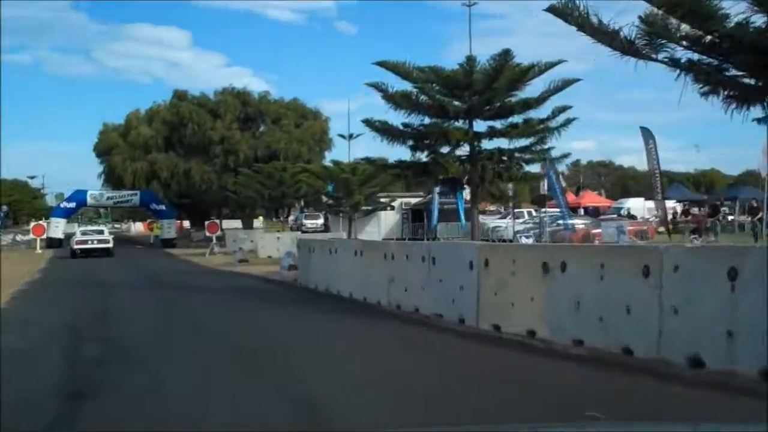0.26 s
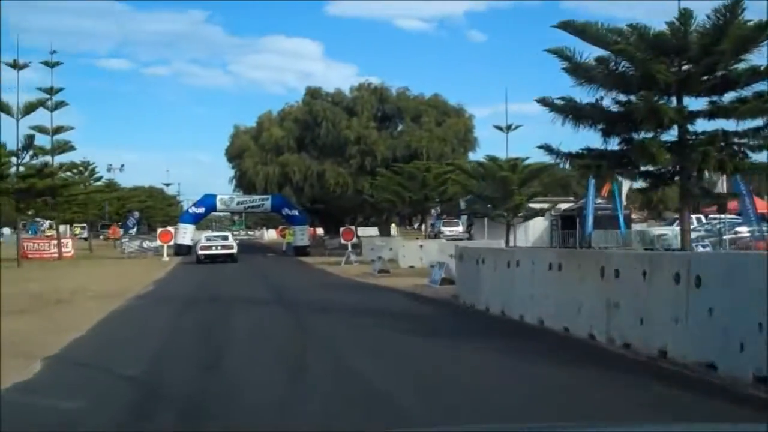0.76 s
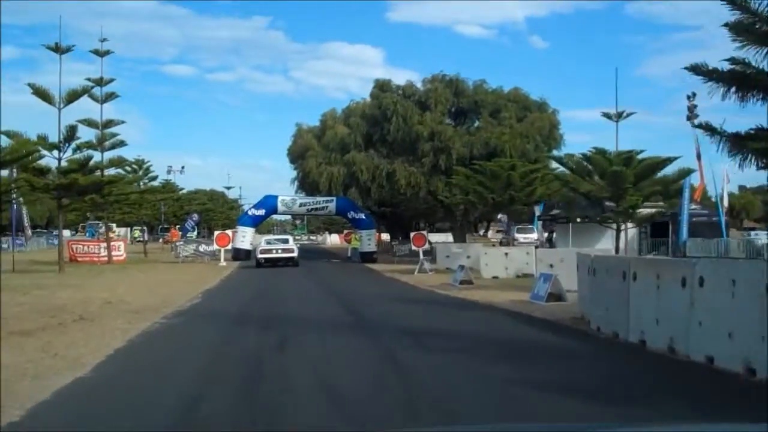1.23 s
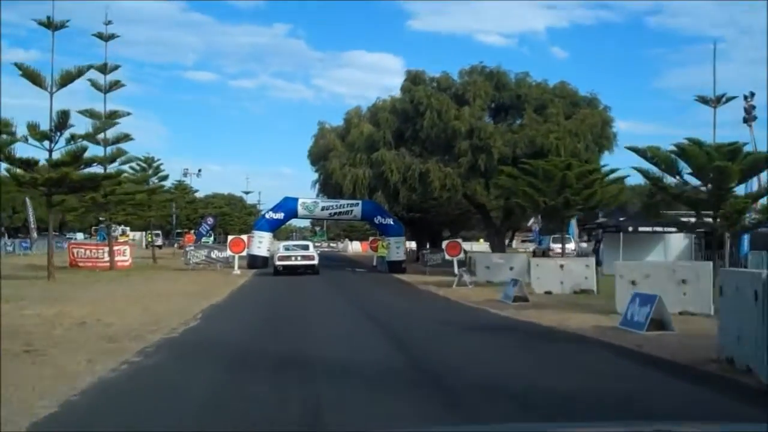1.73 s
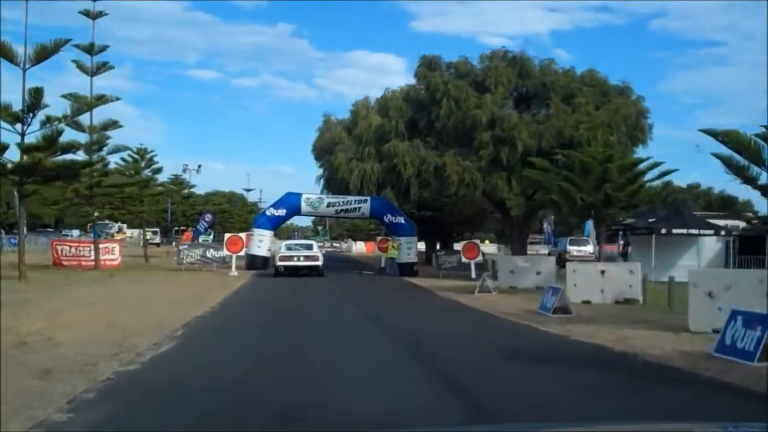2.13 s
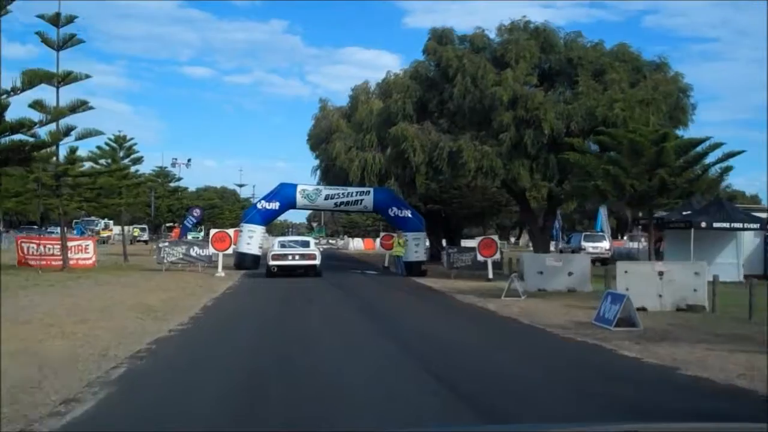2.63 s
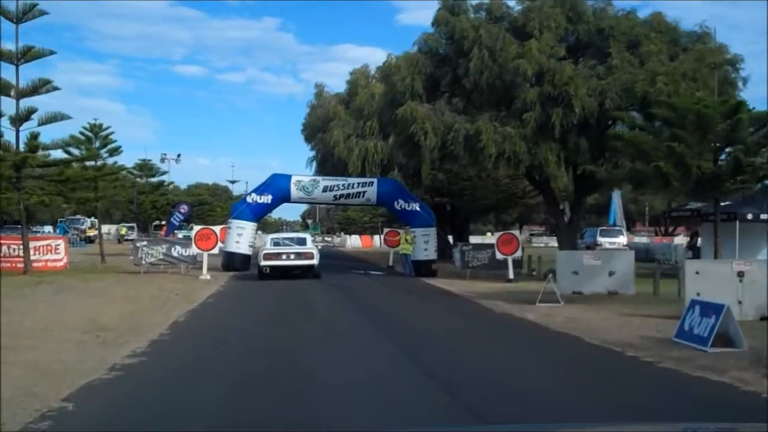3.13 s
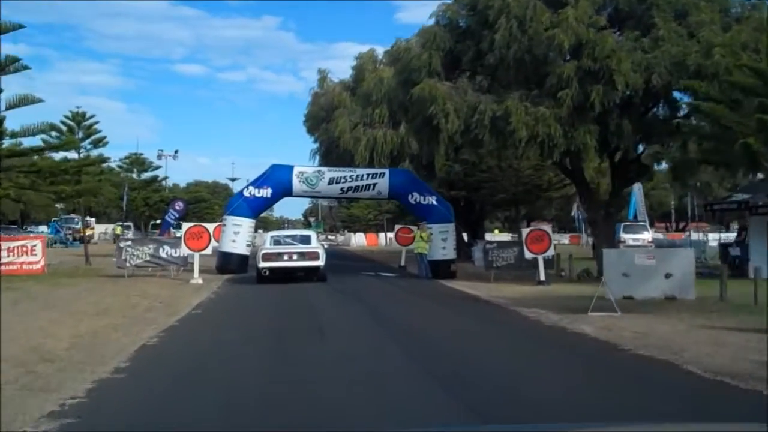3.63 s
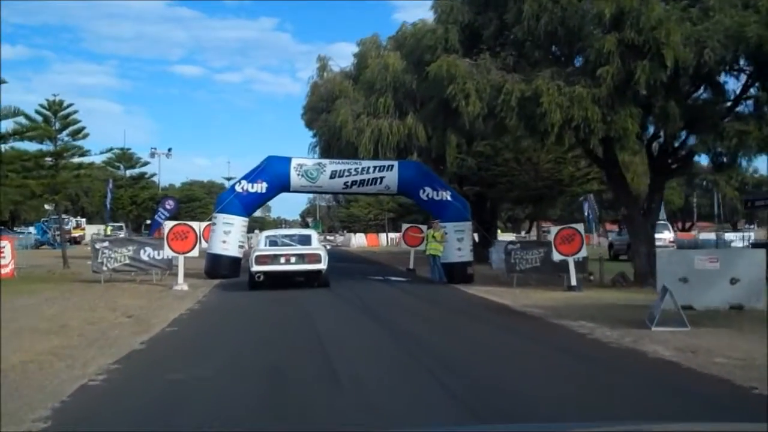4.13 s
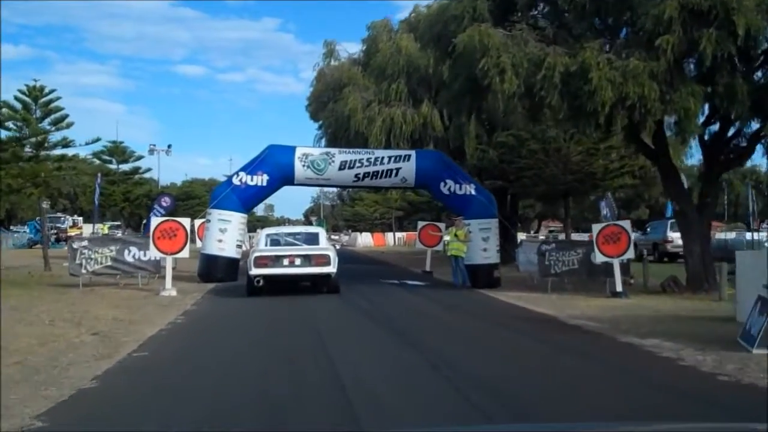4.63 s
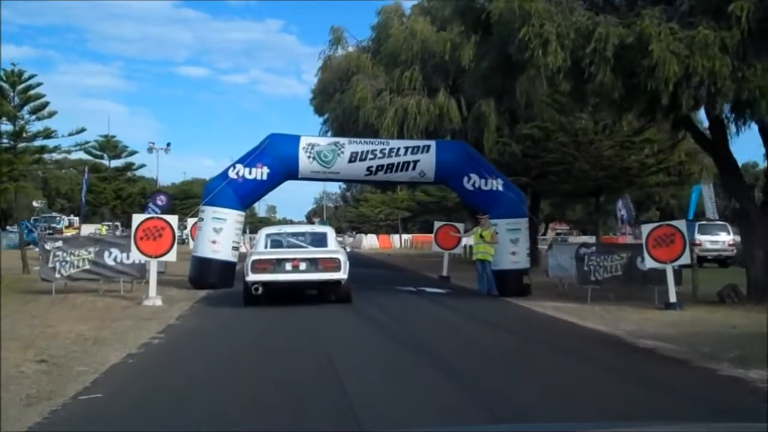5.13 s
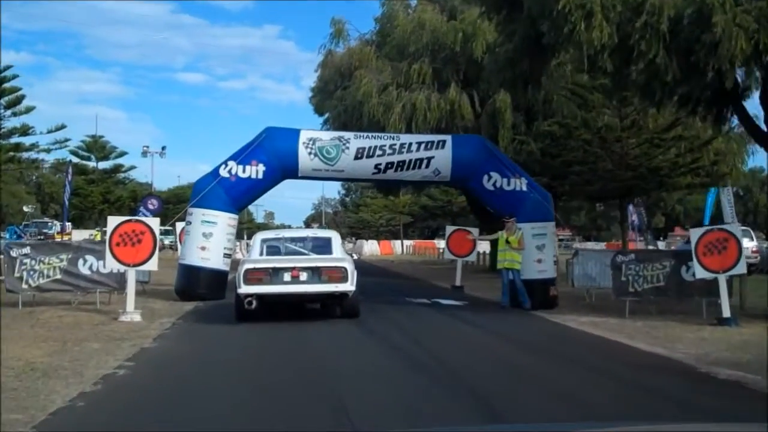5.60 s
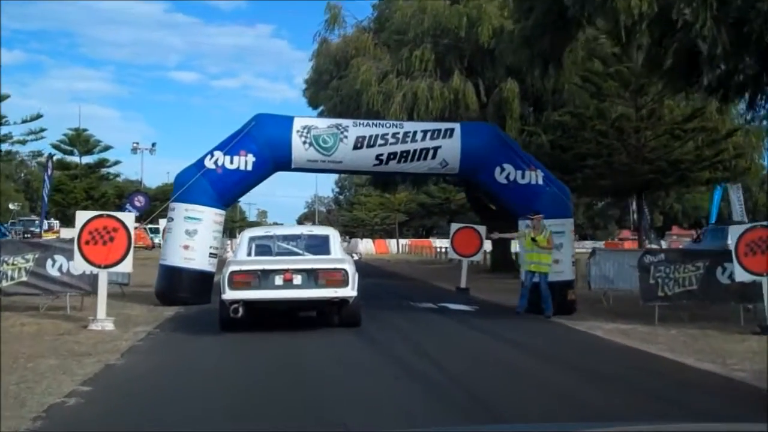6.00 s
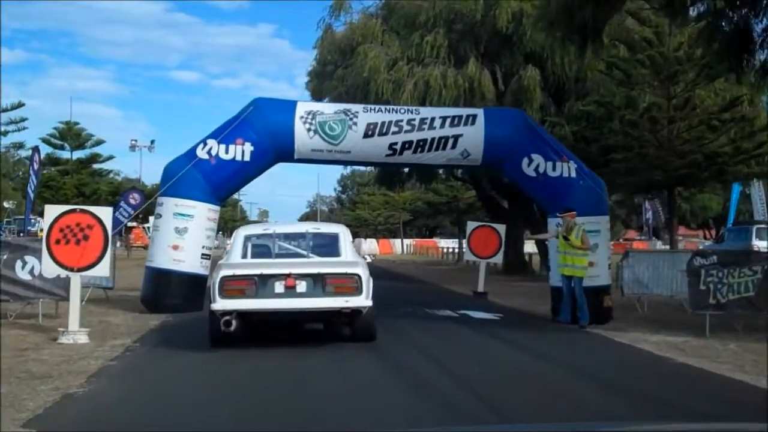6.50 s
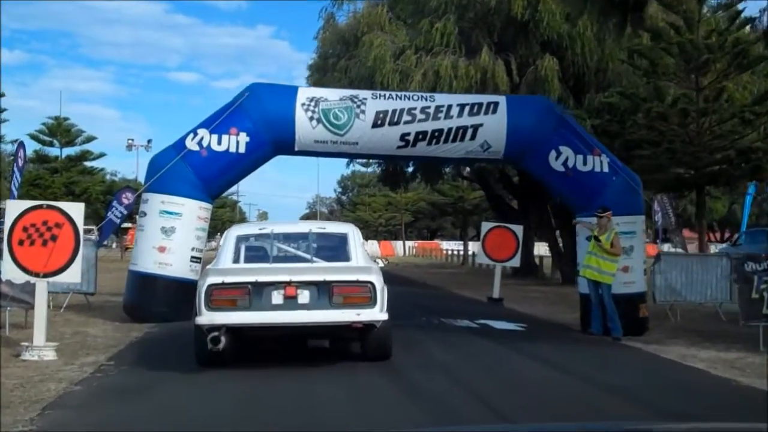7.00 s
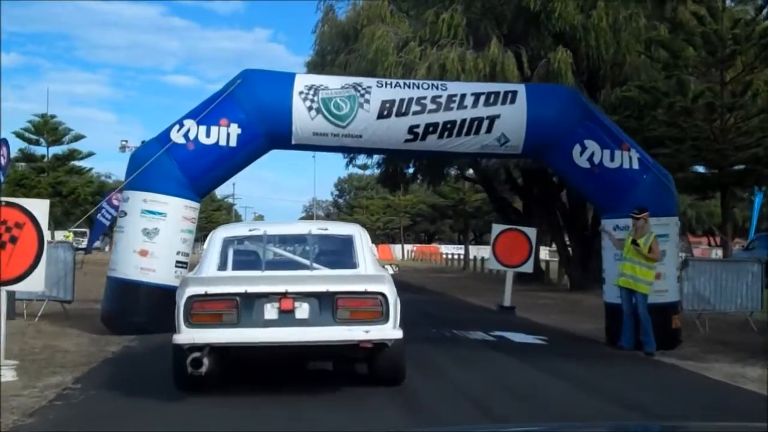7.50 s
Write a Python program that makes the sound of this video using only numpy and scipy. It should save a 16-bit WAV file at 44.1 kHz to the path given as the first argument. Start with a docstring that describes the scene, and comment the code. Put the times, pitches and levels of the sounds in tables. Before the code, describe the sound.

Heard from inside a stripped competition car, a deep engine drone and tyre rumble fill the cabin as it slows. The brakes squeak briefly around a quick downshift, then the revs sink to a lumpy near-idle while trim ticks and the body thuds softly. Finally another car in front gives three sharp, barking revs and begins to move off.

```python
"""A four-cylinder engine booms in the cabin of a stripped competition car that slows down, blips a
downshift and rolls up behind another car. The cabin passes the low engine orders as near sines; road
rumble rings the panels and a body mode, under hiss and a faint hum. Brake pads lock into squeaks, trim
and grit tick, and a faint whine comes as the car creeps. At the end the six-cylinder car ahead revs in
three bursts and pulls away, its uneven firings ringing the exhaust."""
import sys
import numpy as np
from scipy import signal
from scipy.io import wavfile
from scipy.ndimage import uniform_filter1d

SR = 44100
rng = np.random.default_rng(int(sys.argv[2]) if len(sys.argv) > 2 else 0)


def dump_mix(stems):
    """Bounce the given channels to the path in sys.argv[1] as a 16-bit WAV at rate SR."""
    frames = np.atleast_2d(stems).T  # one column per channel
    limited = np.clip(frames, -1, 1)  # hard clip at full scale
    pcm = np.round(limited * 32767).astype(np.int16)
    wavfile.write(sys.argv[1], SR, pcm)


N = 341775
TIME_S = np.arange(N) / SR
LEFT_RIGHT = np.array([[1], [-1]])


def from_db(db):
    return 10 ** (np.asarray(db) / 20)


def unit_rms(x):
    return x / np.sqrt(np.mean(x ** 2) + 1e-20)


def in_time(rows):
    times_s, *columns = np.transpose(rows)
    return [np.interp(TIME_S, times_s, column) for column in columns]


def at_hz(rows, hz):
    points_hz, values = np.transpose(rows)
    return np.interp(np.log(hz), np.log(points_hz), values)


def drift(rate_hz):
    """Slow random wander, rms 1: noise through two one-pole low-passes."""
    r = np.exp(-80 * np.pi * rate_hz / SR)
    slow = signal.lfilter([1], [1, -2 * r, r * r], rng.standard_normal(N // 40 + 2002))[2000:]
    return np.interp(np.arange(N) / 40, np.arange(len(slow)), unit_rms(slow))


def waver():
    """Gain that swells and sinks by a few dB."""
    return from_db(2 * drift(8))


def band(x, low_hz, high_hz):
    return signal.sosfilt(signal.butter(2, [low_hz, high_hz], "band", fs=SR, output="sos"), x)


def resonance(x, hz, width_hz):
    """Two-pole peak, unity gain on top."""
    r = np.exp(-np.pi * width_hz / SR)
    feedback = [1, -2 * r * np.cos(2 * np.pi * hz / SR), r * r]
    return signal.lfilter(np.array([1, 0, -1]) * (1 - r * r) / 2, feedback, x)


# Own engine: t/s, firing rate/Hz, load/dB
ENGINE = [(0, 117.6, 2.5), (.6, 109, 0.5), (1.1, 109, 1.5), (1.34, 101, -2.5), (1.415, 98, -11),
          (1.48, 88, 3.5), (1.54, 108, 5), (1.614, 137, 3.5), (1.674, 150, 7.5), (1.688, 155, -9),
          (1.702, 163, 0.5), (1.755, 165, 3.5), (1.795, 123, -18), (1.825, 112, -2.5), (1.885, 127, -14),
          (1.92, 141, -3), (1.955, 141, -17), (1.98, 145, -4.5), (2.09, 134, -1), (2.37, 113, 0),
          (2.6, 91, -7.5), (2.95, 69.6, -4), (3.18, 55.3, -4), (3.42, 46.2, -7.5), (3.55, 44.2, -3),
          (3.7, 44.8, -11.5), (3.85, 44.4, -13), (4.25, 39.2, -7.5), (4.38, 43, -11), (4.46, 34.2, -8),
          (4.54, 43, -5), (4.6, 54, 1), (4.72, 65, 0.5), (4.9, 67.5, -0.5), (5.14, 68.7, -1),
          (5.26, 65.4, -5.5), (5.42, 51, -7.5), (5.76, 49.2, -7.5), (6.0, 45, -4.5), (6.3, 48.7, -7.5),
          (6.5, 39.6, -5), (6.7, 46, -6), (7.0, 47.5, -6), (7.3, 40.6, -14.5), (7.37, 47, -11),
          (7.75, 53, 3.5)]
# Cabin response to engine tones: f/Hz, gain/dB
CABIN = [(35, -15), (46, -28.5), (57, -18), (68, -28), (85, -22), (97, -15.5), (111, -11.5), (124, -14),
         (137, -13), (155, -20.5), (182, -17), (204, -19), (240, -27), (275, -35), (330, -33.5), (460, -44),
         (570, -31.5)]
# Firing harmonics 2-6: level/dB
OVERTONES_DB = [-13, -19.5, -20.5, -23, -24]
# Harmonic offsets: t/s, 2nd/dB, 3rd/dB
OVERTONE_OFFSETS = [(0, -1.5, 9), (2.5, 1.5, -2), (3.1, -0.5, -1), (3.4, -2.5, 0.5), (3.55, 9.5, -14),
                    (3.85, 7.5, -16), (4.3, 8, -5), (4.48, -5, 15), (4.56, 1.5, 7.5), (4.64, 3.5, 2),
                    (5.1, 1.5, 1), (5.2, -7, -16), (5.4, 1.5, 2.5), (5.8, -1.5, 1.5), (6.1, -12, 3.5),
                    (6.35, -1, 4), (6.5, -1, 2.5), (7.3, 6, -7), (7.75, -4, -15)]
# Orders from uneven cylinders: multiple of firing rate, level/dB re road
WEAK_ORDERS = [(.5, -16), (1.5, -21), (2.5, -7.5)]
CABIN_CUT_HZ = 222

def own_engine(road_db):
    """Engine orders boom through the cabin as near sines; slow firings are sharper and less even."""
    firing_hz, load_db = in_time(ENGINE)
    phase = 2 * np.pi * np.cumsum(firing_hz * (1 + 0.0039 * drift(18.66))) / SR
    octaves_down = np.maximum(np.log2(110 / firing_hz), 0)
    load_db = load_db + 1.2 * octaves_down * drift(20)
    out = from_db(load_db + at_hz(CABIN, firing_hz) + 0.63 * drift(25)) * np.sin(phase)
    offset_db = dict(zip([2, 3], in_time(OVERTONE_OFFSETS)))
    for multiple, level_db in enumerate(OVERTONES_DB, start=2):
        overtone_db = level_db + 3.5 * octaves_down + offset_db.get(multiple, 0)
        gain = from_db(load_db + overtone_db + at_hz(CABIN, multiple * firing_hz)) * waver()
        slip_rad = .18 * drift(13)
        out += gain * np.sin(multiple * phase + 1 + slip_rad)
    for multiple, level_db in WEAK_ORDERS:
        passed = 1 / (1 + (multiple * firing_hz / CABIN_CUT_HZ) ** 6)
        gain = passed * from_db(road_db + level_db) * waver()
        out += gain * np.sin(multiple * phase + rng.uniform(0, 2 * np.pi))
    return np.sqrt(2) * out


# Hum, falling with road speed: t/s, f/Hz, level/dB
HUM = [(0, 272.2, -33.5), (1.5, 257.8, -52), (2.1, 284, -40), (2.5, 266.5, -43), (2.8, 235, -32.5),
       (3.25, 198.1, -33.5), (3.45, 184, -75)]
# Whine while creeping: t/s, f/Hz, level/dB
WHINE = [(3.6, 716, -58), (3.9, 731, -57.5), (4.5, 739.5, -62), (4.8, 741.6, -72)]

def faint_tone(curve, pitch_spread):
    """Hum or whine: one sine, unsteady in level and pitch."""
    hz, level_db = in_time(curve)
    gain = np.sqrt(2) * from_db(level_db + 2.9 * drift(6.1))
    return gain * np.sin(2 * np.pi * np.cumsum(hz * (1 + pitch_spread * drift(10))) / SR)


# Stereo width of the noise: f/Hz, left-right correlation
CORRELATION = [(60, 0.99), (180, 0.98), (530, 0.94), (1550, 0.62), (4590, 0.033), (13600, 0.051)]
# Stereo balance of the noise: f/Hz, left minus right/dB
BALANCE = [(60, 1.5), (230, 0.5), (900, 0.5), (3500, 1), (13600, -2.5)]
BASS_BELOW_HZ = 190

def shaped_noise(spectrum, flicker_db, bass_db=0):
    """Stereo noise in flickering third-octave bands, rms near 1."""
    bottom_hz, top_hz = spectrum[0][0], spectrum[-1][0]
    edges_hz = np.geomspace(bottom_hz, top_hz, int(3 * np.log2(top_hz / bottom_hz)))
    common_flicker = .5 * drift(2.7)
    white = rng.standard_normal((2, 2, N))
    out = 0
    for k, (low_hz, high_hz) in enumerate(zip(edges_hz, edges_hz[1:])):
        mid, side = band(white[k % 2], low_hz, high_hz)
        hz = np.sqrt(low_hz * high_hz)
        alike = np.clip(at_hz(CORRELATION, hz), 0, 1)
        level_db = at_hz(spectrum, hz) + bass_db * (hz < BASS_BELOW_HZ)
        level_db = level_db + flicker_db * (common_flicker + drift(17))
        gain = from_db(level_db + at_hz(BALANCE, hz) / 2 * LEFT_RIGHT)
        out = out + gain * (np.sqrt(1 + alike) * mid + np.sqrt(1 - alike) * side * LEFT_RIGHT)
    return out / np.sqrt(np.mean((out / from_db(bass_db / 2)) ** 2))


# Rolling noise: t/s, rumble/dB, hiss/dB, rumble bass offset/dB
ROLLING = [(0, -21.5, -45, -4.5), (.4, -21, -51.5, -7.5), (.62, -22, -48, -4.5), (1.5, -22, -50, -1.5),
           (1.6, -20, -50, 1), (1.95, -22, -50.5, -3), (3.19, -27.5, -55, -0.5), (3.91, -33, -54, -3.5),
           (4.7, -31, -55, 5), (5.5, -32, -55, 2.5), (6.6, -37, -55.5, 1), (7.2, -28.5, -50.5, 1.5),
           (7.75, -34.5, -61, -0.5)]
# Rumble and hiss spectra: f/Hz, relative density/dB
RUMBLE_SPECTRUM = [(22, 6), (40, 14), (75, 11), (110, 14.5), (200, 3.5), (290, -5), (350, -5.5), (600, -11),
                   (800, -18), (1200, -20.5), (1800, -22.5), (3000, -30.5)]
HISS_SPECTRUM = [(700, 1.5), (1100, -2.5), (2000, 0), (4000, 0), (7000, -6), (10000, -13), (11500, -30.5),
                 (14500, -39.5)]
# Panel modes: f/Hz, width/Hz, gain/dB
PANEL_MODES = [(216, 22, -2), (273, 29, -2.5), (342.6, 30, -2), (466, 40, 0.5), (570, 51, -0.5),
               (756, 27, -1.5), (993, 226, -3)]
# Panel ringing: t/s, gain/dB
PANEL_RING = [(0, -5), (.4, 3.5), (1.3, -0.5), (3.3, -3), (4.1, 4), (4.9, 3), (5.6, 0.5), (7.75, 12)]

def road_noise(road_db, hiss_db, bass_db):
    """Rolling makes rumble and hiss; the rumble rings the panels."""
    rumble = from_db(road_db) * shaped_noise(RUMBLE_SPECTRUM, flicker_db=1.74, bass_db=bass_db)
    ring_db, = in_time(PANEL_RING)
    panels = sum(from_db(db) * resonance(rumble, hz, width_hz) for hz, width_hz, db in PANEL_MODES)
    hiss = from_db(hiss_db) * shaped_noise(HISS_SPECTRUM, flicker_db=1.68)
    return rumble + from_db(ring_db) * panels + hiss


# Bumps: t/s, half length/s, f/Hz, level/dB
BUMPS = [(1.481, 0.036, 47.53, -24), (1.892, 0.07, 51, -17.5), (3.395, 0.055, 45.57, -22.5),
         (3.717, 0.039, 51.94, -26), (4.629, 0.06, 54.08, -31), (4.808, 0.036, 48.56, -27),
         (6.239, 0.14, 54.1, -25), (6.732, 0.05, 48.12, -20.5)]

def body_boom(road_db, mode_hz=50, width_hz=17, re_road_db=-18):
    """The road shakes a body mode; each bump makes it swell and fade."""
    bumps = np.zeros(N)
    for peak_s, half_s, hz, db in BUMPS:
        swell = from_db(db) * np.exp(-((TIME_S - peak_s) / half_s) ** 2)
        bumps += swell * np.sin(2 * np.pi * (hz * TIME_S + rng.random()))
    shake = resonance(resonance(rng.standard_normal(N), mode_hz, width_hz), mode_hz, width_hz)
    return np.sqrt(2) * bumps + from_db(road_db + re_road_db) * unit_rms(shake)


# Squeaks: t/s, length/s, f/Hz, level/dB, 2nd/dB re 1st, 3rd/dB re 1st, wobble/Hz
SQUEAKS = [(-.03, 0.29, 1735, -47, -23, -31, 15), (0.942, 0.15, 1750, -45, -19, -28, 32),
           (1.706, 0.12, 1740, -38.5, -24.5, -38, 3.8), (1.809, 0.16, 1748, -38.5, -19.5, -24, 4.1),
           (2.225, .13, 1784, -54, -3, -18, 12), (3.069, 0.073, 3250, -52, -24, -28, 3.47),
           (5.757, 0.11, 1728, -54, -23, -27, 5.04)]

def brakes():
    """Pad and disc lock briefly into a mode: an unsteady tone with two overtones."""
    out = np.zeros(N)
    for start_s, length_s, hz, db, second_db, third_db, wobble_hz in SQUEAKS:
        swell = np.sin(np.pi * np.clip((TIME_S - start_s) / length_s, 0, 1)) ** 0.85
        flutter_db = (1.2 + .12 * wobble_hz) * drift(45)
        phase = 2 * np.pi * np.cumsum(hz + wobble_hz * drift(28)) / SR
        second = from_db(second_db + 2.5 * drift(20)) * np.sin(2 * phase)
        third = from_db(third_db) * np.sin(3 * phase)
        out += swell * from_db(db + flutter_db) * (np.sin(phase) + second + third)
    return np.sqrt(2) * out


# Trim and grit ticks: t/s, bright part/dB, low part/dB
TICKS = [(0.0965, -49, -42), (0.308, -52, -34), (0.448, -62, -37), (0.7627, -39.5, -47), (0.79, -55, -35.5),
         (1.168, -41, -48), (1.262, -44, -46), (1.4307, -55, -39), (1.5216, -43, -39), (1.5527, -53, -36),
         (1.607, -56, -43), (2.1984, -48, -41), (2.4324, -40.5, -34), (2.6365, -48, -46), (2.74, -52, -40),
         (2.8409, -48, -53), (3.7925, -44, -42), (3.929, -56, -40), (4.3936, -35.5, -31.5),
         (4.424, -50, -41), (5.6469, -60, -33.5), (6.2, -61, -44), (7.347, -58, -41), (7.401, -47, -54),
         (7.443, -54, -40)]
# Trim modes: f/Hz, width/Hz, gain/dB
TRIM_MODES = [(1800, 350, 6), (4000, 550, 7)]

def ticks(rise_s=0.00037, t60_s=0.042, fast_until_s=2.8):
    """Trim and grit tick as noise bursts from random sides; eight faint extras while the car is fast."""
    out, t = np.zeros((2, N)), np.arange(SR // 10) / SR
    envelope = from_db(-60 * t / t60_s) * np.minimum(t / rise_s, 1)
    faint = [(fast_until_s * rng.random(), *rng.normal([-54, -45], 2.5)) for _ in range(8)]
    for start_s, bright_db, low_db in TICKS + faint:
        burst = envelope * (rng.standard_normal(len(t)) + 0.25 * rng.standard_normal((2, len(t))))
        bright, low = band(burst, 5500, 10500), band(burst, 900, 4800)
        low = low + sum(from_db(db) * resonance(low, hz * (1 + .08 * rng.uniform(-1.4, 1)), width_hz)
                        for hz, width_hz, db in TRIM_MODES)
        tick = from_db(bright_db) * bright / np.abs(bright).max()
        tick += from_db(low_db) * low / np.abs(low).max()
        at = round(start_s * SR)
        out[:, at:at + len(t)] += from_db(rng.normal(-.5, 1) * LEFT_RIGHT) * tick
    return out


# Throttle stabs ahead: full at t/s, rise/s, hold/s, fall/s, tone lag/s,
# tone gain/dB, side-order gain/dB, bark gain/dB, rasp gain/dB
STABS = [(6.866, 0.27, 0.048, 0.039, 0.015, 17.5, 4, 15.1, 3),
         (7.086, 0.053, 0.026, 0.092, 0.047, 22.5, 12, 16.5, 9.5),
         (7.293, 0.026, 0.034, 0.067, 0.0086, 18.5, 5, 11.2, 5.3),
         (7.404, 0.087, 0.17, 0.21, 0.052, 8, 6, 4.1, 7.3)]
# Delay after a stab: side orders/s, bark/s, rasp/s
LAGS_S = [-.03, 0, .018]
# Off-throttle levels: at idle/dB, slope/(dB per octave of revs)
COAST_TONE, COAST_SIDE, COAST_BARK, COAST_RASP = (-21.5, 4.7), (-35, 1), (-51, 14.4), (-66, 9.6)
IDLE_CYCLE_HZ = 16

def throttle_levels(cycle_hz):
    """Tone, side-order, bark and rasp levels in dB: each grows with revs and jumps with a stab."""
    octaves_up = np.log2(cycle_hz / IDLE_CYCLE_HZ)
    levels_db = []
    for k, (idle_db, db_per_octave) in enumerate([COAST_TONE, COAST_SIDE, COAST_BARK, COAST_RASP]):
        stabs_db = []
        for full_s, rise_s, hold_s, fall_s, tone_lag_s, *gains_db in STABS:
            since_s = TIME_S - full_s - [tone_lag_s, *LAGS_S][k]
            opening = np.interp(since_s, [-rise_s, 0, hold_s, hold_s + fall_s], [0, 1, 1, 0])
            stabs_db.append(gains_db[k] * opening)
        levels_db.append(idle_db + db_per_octave * octaves_up + np.max(stabs_db, axis=0))
    return levels_db


# Orders beside the firing tone: multiple of cycle rate, relative level/dB
SIDE_ORDERS = [(5.0, 0), (7.0, -8), (9.0, -12)]

def exhaust_tones(cycle_hz, cycles, tone_db, side_db):
    """Low orders of the six-cylinder; the third firing harmonic rings as it meets a pipe mode."""
    firing_phase = 12 * np.pi * cycles
    tone_db = tone_db + at_hz(CABIN, 6 * cycle_hz)
    tones = from_db(tone_db + 1.2 * drift(30)) * np.sin(firing_phase)
    tones += resonance(from_db(tone_db - 17) * np.sin(3 * firing_phase), hz=612, width_hz=40)
    for multiple, level_db in SIDE_ORDERS:
        passed = 1 / (1 + (multiple * cycle_hz / CABIN_CUT_HZ) ** 8)
        gain = passed * from_db(side_db + level_db) * waver()
        tones += gain * np.sin(2 * np.pi * (multiple * cycles + rng.random()))
    fourth_order_db = -29 + 12 * np.minimum(np.log2(cycle_hz / IDLE_CYCLE_HZ / 2), 0)
    tones += from_db(fourth_order_db) * waver() * np.sin(8 * np.pi * cycles)
    return np.sqrt(2) * tones


# Exhaust modes: f/Hz, width/Hz, relative level/dB
EXHAUST_MODES = [(212, 22, 3), (334.3, 11.8, 6), (372, 12.7, 5), (408, 15, -2), (466.7, 34, -0.5),
                 (548, 31.5, -4), (600.3, 22.6, -4.5), (820, 32, -22.5), (1079, 150, -25.5)]

def exhaust_bark(pulses, bark_db):
    """Pressure pulses ring the exhaust; a louder bark is brighter."""
    ring = sum((-1) ** k * from_db(db) * resonance(pulses, hz, width_hz) / np.sqrt(width_hz)
               for k, (hz, width_hz, db) in enumerate(EXHAUST_MODES))
    ring /= np.sqrt(uniform_filter1d(ring ** 2, size=4000) + 1e-20)   # running rms 1
    bite = from_db(26 + bark_db) * band(ring, 680, 1400)
    return from_db(bark_db) * (ring + bite)


# Revs of the car ahead: t/s, engine cycle rate/Hz
AHEAD_REVS = [(6.5, 14.7), (6.68, 14.5), (6.76, 17.5), (6.8, 21.5), (6.84, 24), (6.92, 26.8), (6.97, 29),
              (7.06, 31.5), (7.145, 33.5), (7.28, 33.7), (7.36, 35.4), (7.46, 35.2), (7.6, 32.7),
              (7.75, 31)]
# Tailpipe pulses, one manifold stronger: signed relative pressure per cylinder
CYLINDERS = [.4, -.15, .15, -.15, .38, .08]
# Rasp spectrum: f/Hz, relative density/dB
RASP_SPECTRUM = [(800, -34), (1300, -15), (2100, 4), (2800, -2.5), (3800, 0), (4900, -3), (6000, -4.5),
                 (8000, -11), (13000, -43)]

def car_ahead(fade_in_s=0.065):
    """Six uneven firings a cycle drive the exhaust and gate a rasp. Returns mono pipe, stereo rasp."""
    cycle_hz, = in_time(AHEAD_REVS)
    tone_db, side_db, bark_db, rasp_db = throttle_levels(cycle_hz)
    cycles = np.cumsum(cycle_hz * (1 + 0.0055 * drift(12))) / SR
    tones = exhaust_tones(cycle_hz, cycles, tone_db, side_db)
    firing = (6 * cycles).astype(int)
    pressure = np.array(CYLINDERS)[firing % 6] + .09 * rng.standard_normal(N)[firing]
    puff = np.exp(-3 * (6 * cycles % 1))
    gas = puff * rng.standard_normal(N)
    pulses = pressure * (np.diff(firing, prepend=0) > 0) + .01 * gas
    gate = uniform_filter1d(np.abs(pressure) * puff, size=30)
    rasp = from_db(rasp_db) * unit_rms((0.25 + gate) * shaped_noise(RASP_SPECTRUM, flicker_db=.5))
    in_earshot = np.clip((TIME_S - AHEAD_REVS[0][0]) / fade_in_s, 0, 1)
    return in_earshot * (tones + exhaust_bark(pulses, bark_db)), in_earshot * rasp


def scene():
    """Cabin mix; boom and brakes sit slightly left."""
    road_db, hiss_db, bass_db = in_time(ROLLING)
    pipe, rasp = car_ahead()
    engine = own_engine(road_db)
    hum = faint_tone(HUM, pitch_spread=0.01015)
    whine = faint_tone(WHINE, pitch_spread=.004)
    boom = (engine + hum + whine + body_boom(road_db) + pipe) * from_db(.6 * LEFT_RIGHT)
    road = road_noise(road_db, hiss_db, bass_db)
    return boom + road + brakes() * from_db(.4 * LEFT_RIGHT) + ticks() + rasp


MIC_NOISE_DB, CUTOFF_HZ = -73, 14700

def record(dry):
    """Thin, steady microphone hiss, then a steep treble cut."""
    hiss = from_db(MIC_NOISE_DB) * unit_rms(band(rng.standard_normal(dry.shape), 4500, 14000))
    return signal.sosfilt(signal.cheby2(12, 70, CUTOFF_HZ, fs=SR, output="sos"), dry + hiss)


dry = scene()
out = record(dry)
dump_mix(out)
```